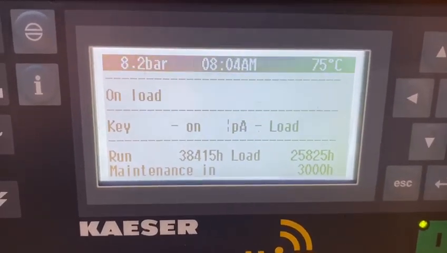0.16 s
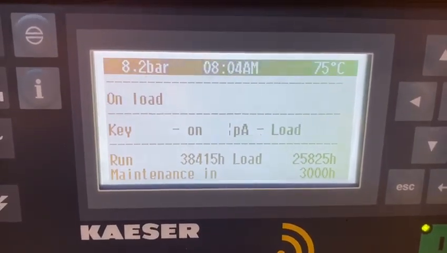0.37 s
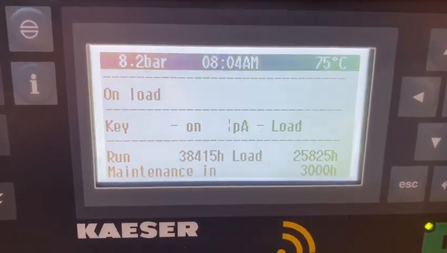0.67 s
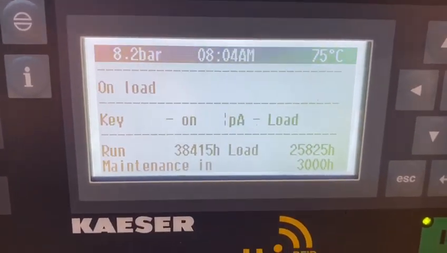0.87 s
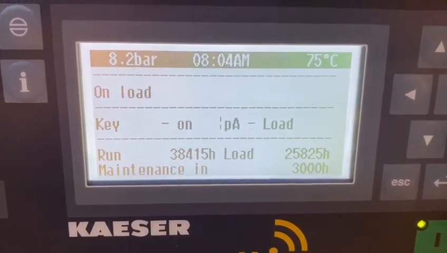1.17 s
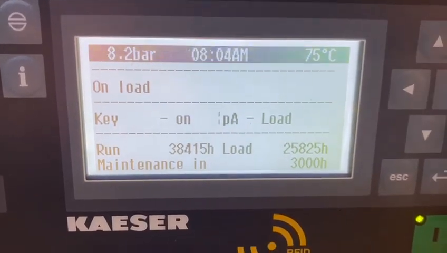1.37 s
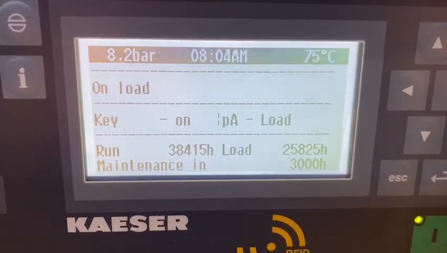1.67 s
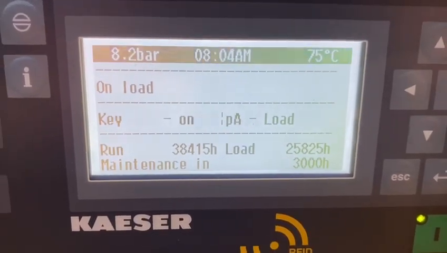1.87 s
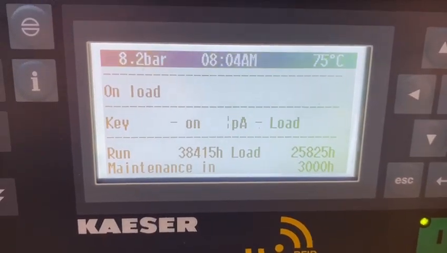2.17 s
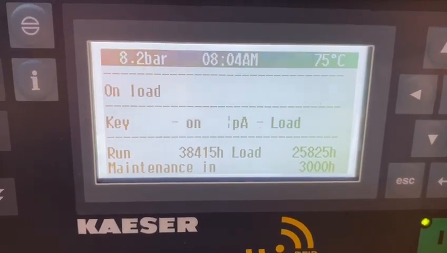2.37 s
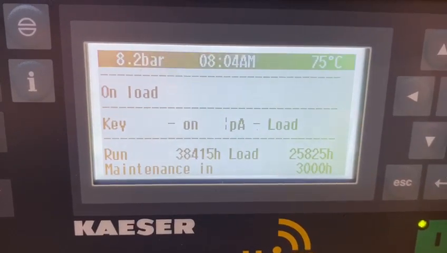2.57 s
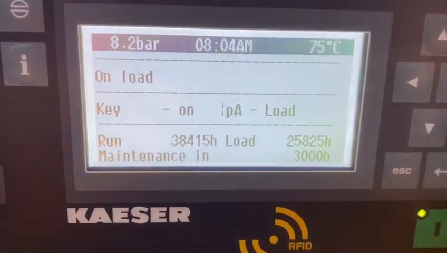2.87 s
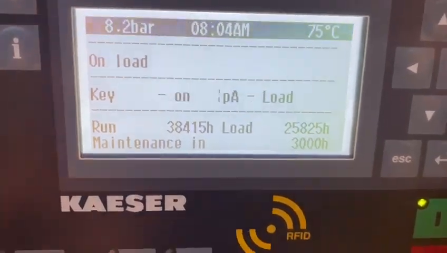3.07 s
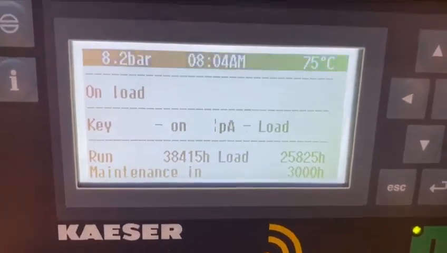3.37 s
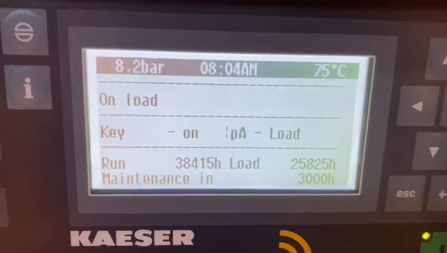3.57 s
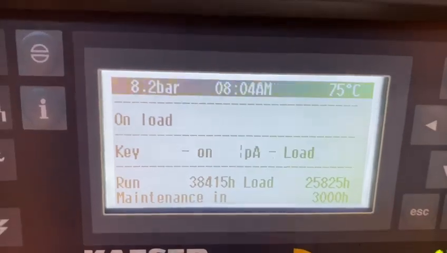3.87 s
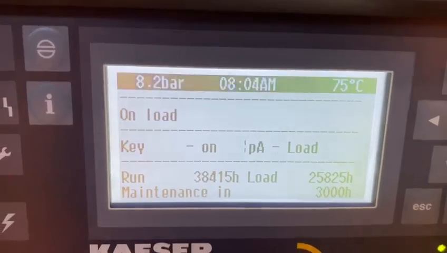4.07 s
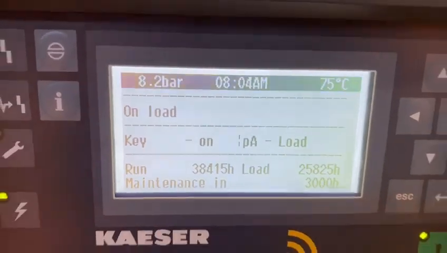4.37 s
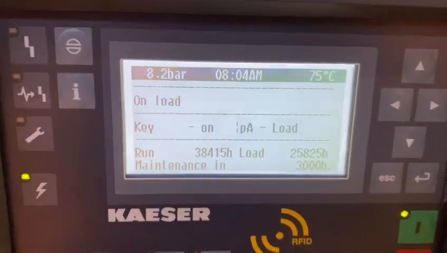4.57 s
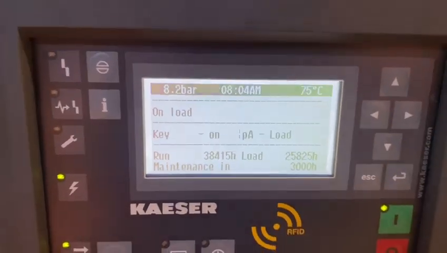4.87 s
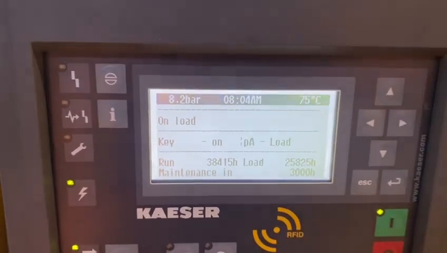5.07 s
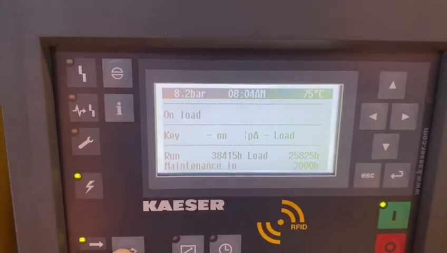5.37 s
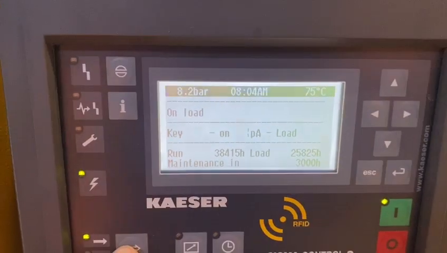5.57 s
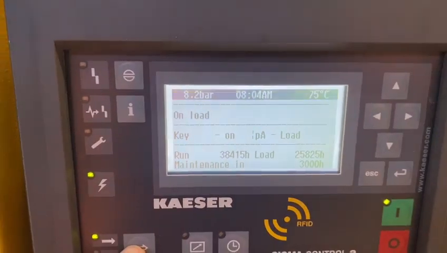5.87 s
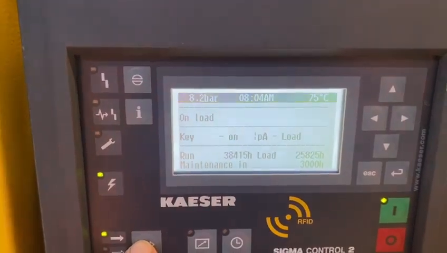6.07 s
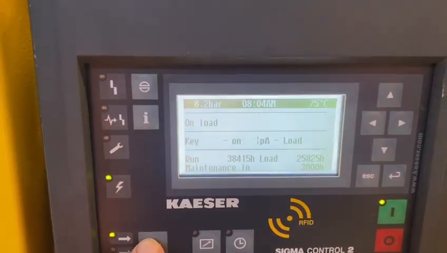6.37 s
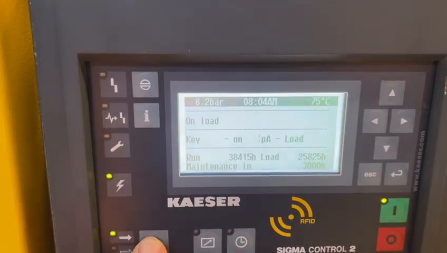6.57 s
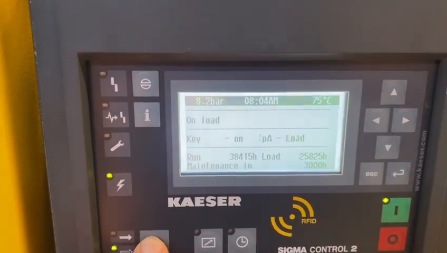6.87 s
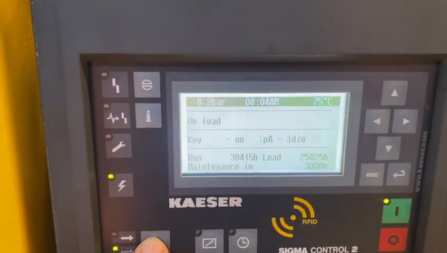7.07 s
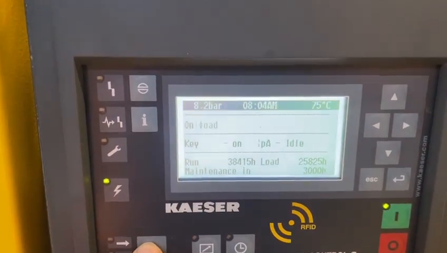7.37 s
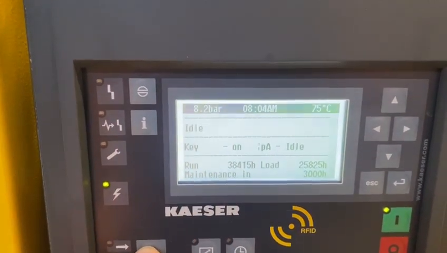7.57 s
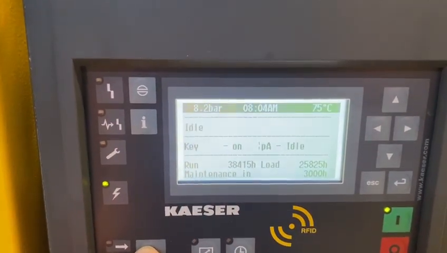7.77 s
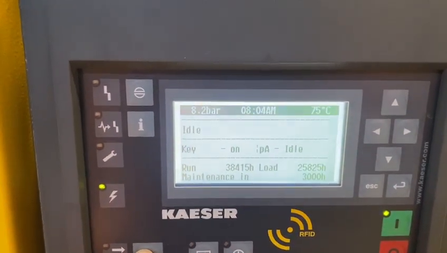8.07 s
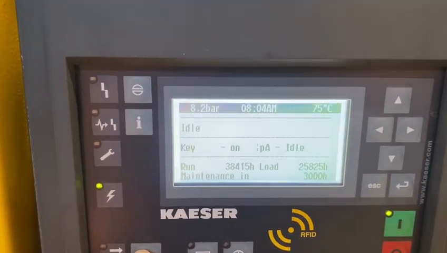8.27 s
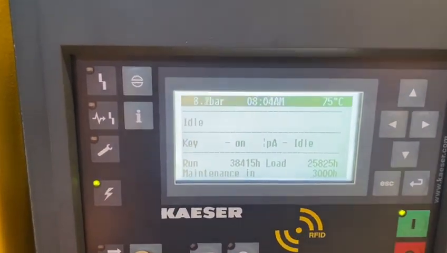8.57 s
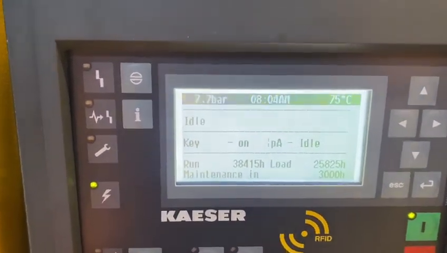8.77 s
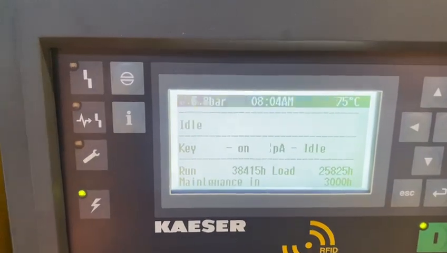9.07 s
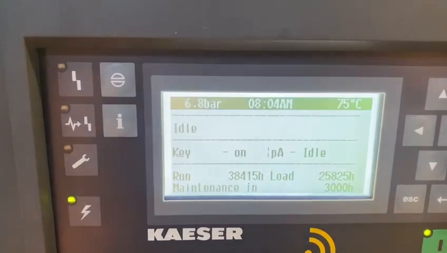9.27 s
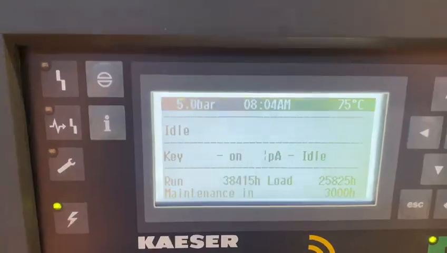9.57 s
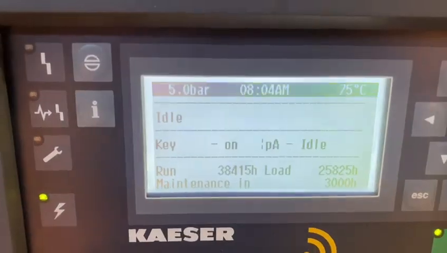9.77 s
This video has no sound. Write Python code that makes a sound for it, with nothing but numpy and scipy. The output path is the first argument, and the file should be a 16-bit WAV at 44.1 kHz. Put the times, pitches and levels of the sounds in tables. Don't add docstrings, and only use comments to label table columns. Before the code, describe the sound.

From 0 s, with no start-up, a screw air compressor is already running at full load in its sheet-metal cabinet in a workshop. Everything sounds at once: a low, slightly lumpy fan rumble strongest near 110 Hz, a faint rotor hum near 250 Hz, a broad casing roar around 1-3 kHz, and a dominant rushing hiss with a noisy whistling band around 6-7 kHz. The stereo microphone is hand-held at arm's length, with short diffuse reflections, a ragged, grainy treble and little above 9 kHz. Around 3-3.3 s it turns, and the hiss shifts colour and gets slightly louder; from 4.4 to 5 s it steps back and the tint changes again. The roar stays steady until about 8 s. Then the inlet closes: the hiss and whistle sink, fastest after 8.6 s, while the casing roar rises slightly and the hum edges up minutely in pitch. It ends near 9.9 s still running, idle.

```python
import sys
import numpy as np
from scipy import signal
from scipy.fft import rfft, irfft, dct, next_fast_len
from scipy.io import wavfile
from scipy.ndimage import uniform_filter1d, map_coordinates

SR = 44100
rng = np.random.default_rng(int(sys.argv[2]) if len(sys.argv) > 2 else 0)


def pcm_store(signal):
    levels = np.round(np.clip(np.atleast_2d(signal), -1, 1) * 32767)
    wavfile.write(sys.argv[1], SR, levels.astype(np.int16).T)


def to_linear_factor(level_db):
    exponent = np.asarray(level_db, float) / 20
    return 10 ** exponent


N = 437463
SIZE = next_fast_len(N)
HZ = np.maximum(np.arange(SIZE // 2 + 1) * SR / SIZE, 1)
PORT_LAG_S = 19.3 / SR

# frequency in Hz, level in dB per Hz, left minus right in dB,
# share heard directly (0-1), extra left lead in rad.
FAN_COLOUR = [(22, -32, -5, 0.8, 0.5), (43, -24, -3.5, 0.7, 1.5), (65, -16.5, -0.5, 0.6, 1.1),
              (83, -13, 3, 0.8, 1.5), (109.7, 1, -3.5, 0.93, 1.4), (152, -4, -0.5, 0.92, 1),
              (217.5, -7.5, -2, 0.95, 0), (322, -12, -5, 0.86, 0.5), (354, -16, -3.5, 0.8, -0.5),
              (421.4, -10.5, -11.5, 1, -0.4), (538, -21, -9, 0.1, 1.5), (721, -19.5, -4, 0.8, -0.5),
              (819, -21.5, 0.5, 0.9, 3), (910, -20.5, 5.5, 0.4, 1.17)]
CASING_COLOUR = [(959, -25.5, -5.5, 0.43, 0.38), (1050, -16.5, -7, 0.62, -0.81),
                 (1210, -17, -0.5, 0.65, -0.99), (1316, -15, 1.5, 0.7, -1.1),
                 (1583, -10.5, -6.5, 0.55, -1.8), (1724, -7.5, -1, 0.66, 0.1), (2032, -10, -3, 0.71, -0.25),
                 (2327, -13, -0.5, 0.51, -0.059), (2720, -12.5, -1, 0.38, 0.37),
                 (3140, -6, -6.5, 0.17, 0.96)]
HISS_COLOUR = [(2600, -13, -2.5, 0.83, -0.18), (3020, -7, 0, 0.56, 0.23), (3900, -8.5, 2, 0.49, -0.12),
               (4250, -10, 1.5, 0.66, -0.46), (4960, -7, 0, 0.31, -0.11), (5230, -9, 0.5, 0.32, .2),
               (5500, -13.5, 10, 0.35, 0), (5730, -5, 9.5, 0.62, 0.036), (6290, 1.5, 1.5, .75, .15),
               (6830, -2.5, 2.5, .7, .2), (7180, -12.5, 5.5, 0.4, 0.32), (7400, -10, 3, 0.3, 0.4),
               (8340, -16, -2, .3, -0.03), (8860, -25, 0, 0.21, -0.13)]
# frequency in Hz, width in Hz, left gain in dB, right gain in dB.
FAN_PANELS = [(231, 12, 5.5, 4), (320, 21, 7, 3.5)]
CASING_PANELS = [(1043, 83, 5, 3.7), (1561, 21, 3.6, 3.9), (1784, 20, 3.4, 3.1)]
# frequency in Hz, gain in dB.
NEAR_PANEL = [(300, .5), (430, 1.2), (600, 0), (800, 1.8), (930, .3), (1045, 3.5), (1170, 1.2), (1400, 1),
              (1560, -2), (1720, 0)]
# frequency in Hz, width in Hz, left gain in dB, right gain in dB.
RIDGES_CLOSE = [(3620.0, 50.0, 3.5, 3.5), (3830.0, 70.0, 5.0, 6.0), (4250.0, 450.0, 3.0, 3.5),
                (4610.0, 80.0, 5.5, 4.5), (5250.0, 380.0, 9.0, 2.0), (5760.0, 90.0, 2.0, 2.0),
                (5830.0, 140.0, -1.5, 2.5), (6110.0, 50.0, 7.0, 3.0), (6310.0, 110.0, -4.0, -4.5),
                (6410.0, 70.0, 4.0, 2.0), (6650.0, 50.0, -2.0, -4.5), (6820.0, 70.0, -4.5, -2.5),
                (7290.0, 320.0, -7.0, -0.5), (7700.0, 50.0, -5.5, -6.5)]
RIDGES_TURNING = [(3610.0, 80.0, 3.5, 4.0), (4300.0, 380.0, 4.0, 3.5), (4600.0, 140.0, 7.0, 5.0),
                  (5110.0, 90.0, 7.0, 3.5), (5310.0, 180.0, 8.0, 1.5), (5740.0, 270.0, -2.5, 3.5),
                  (5990.0, 110.0, 9.0, 6.5), (6190.0, 60.0, 1.0, -3.5), (6370.0, 230.0, 8.0, 4.5),
                  (6620.0, 130.0, 8.5, 6.0), (6650.0, 50.0, -9.0, -9.0), (7010.0, 60.0, 5.0, 5.5),
                  (7150.0, 470.0, -2.0, 4.0), (7610.0, 60.0, 4.0, 2.0)]
RIDGES_BACK = [(3120.0, 70.0, 2.5, 3.5), (3320.0, 70.0, 4.5, 5.0), (4310.0, 500.0, 5.5, 5.0),
               (4950.0, 150.0, -3.0, -5.0), (5240.0, 500.0, 9.0, 4.0), (5780.0, 170.0, -2.0, -5.5),
               (5900.0, 500.0, -2.0, 9.0), (6130.0, 330.0, 8.0, 0.0), (6420.0, 60.0, 9.0, 6.5),
               (6580.0, 80.0, 9.0, 6.5), (6660.0, 60.0, -3.0, -4.0), (7130.0, 500.0, 5.0, 9.0),
               (7170.0, 80.0, -6.5, -4.0), (7670.0, 60.0, 4.0, 3.0)]
# frequency in Hz, extra left lead in rad close, turning, back.
STANCE_LEAD = [(2900, 0, 0, 0), (3400, 0, .7, 0), (4000, 0, 1.2, 0), (4250, 1.2, 1.2, 0), (4450, 0, 0, 0),
               (4650, -1, 0, 0), (4800, -2.3, 0, 0), (5000, -4.1, 0, 0), (5250, -5.3, 0, -.3),
               (5450, -6.3, 0, -.5), (5800, -5.4, 0, 0), (6400, -5.7, 0, 0), (6800, -6.28, 0, 0),
               (7250, -6.28, .8, .9), (7500, -6.9, -.5, -.7), (8000, -7, 0, 0)]
TOP_DB = [-6, -7.5, -6.5]
# time in seconds, stance (0 close, 1 turning, 2 back).
HAND = [
    (0, 0),
    (2.9, 0),
    (3.3, 1),
    (4.4, 1),
    (5.0, 2),
    (9.92, 2),
]
# time in seconds, pressure as a share of full (0-1).
PRESSURE = [
    (0, 0.99),
    (7.9, 0.97),
    (8.6, .85),
    (9.1, 0.5),
    (9.55, .2),
    (9.92, 0.05),
]
# time in seconds, load (0-1).
LOAD = [
    (0, 1),
    (8.0, 1),
    (8.6, .5),
    (9.2, .1),
    (9.92, 0),
]
# order of the lobe rate, then level in dB loaded left, loaded right, idle left, idle right.
HUM = [(1, -55, -53, -54, -60), (2, -55, -59, -53.5, -56.5), (3, -63, -60.5, -55, -54),
       (4, -58, -66, -72, -80.5), (5, -77.5, -64, -73, -70), (6, -73, -57.5, -54, -65)]
# frequency in Hz, rounding step over the usual level in dB for sum, for
ROUNDING_STEPS = [(300, -14, -14), (750, -2.5, -5), (1500, 0, -3), (1900, -1, 4), (2400, 0, 7), (2800, 3.5, 2),
                  (3200, 6, 3), (3500, 4.5, 4), (3800, 7, 5), (4100, 6, 6), (4500, 4.5, 6.5), (5000, 2, 4),
                  (5600, 1.5, -1), (6400, -4, -1), (7100, 7, 9.5), (7500, 8, 7.5), (7900, 8.5, 8.5),
                  (8300, 10.5, 10), (8700, 15.5, 15.5), (9300, 19, 20)]

FAN_DB, CASING_DB, HISS_DB, WHISTLE_DB = -41, -38.5, -33.5, -30
TURNED_HISS_DB, TURNED_WHISTLE_DB = 1.02, 2
VENTED_CASING_DB, VENTED_HISS_DB, VENTED_WHISTLE_DB = 1.5, -3.5, -7.5
WHISTLE_LOW_HZ, WHISTLE_HIGH_HZ, TOP_LOW_HZ = 5640, 7100, 7326
LOBES_LOADED_HZ, LOBES_IDLE_HZ = 248.1, 249.4
HOP, FRAME_LEAD = 1024, 524
ROUND_UP = .4
STEP_WANDER_DB = 3.5
BITE_FROM_S, BITE_UNTIL_S, BITE_DB = 5.5, 7.95, 4.6
BITE_HZ, BITE_WIDTH_HZ = 3520, 300
TOP_SHADE_DB, TOP_FLICKER_DB, TOP_FROM_HZ = 2.0, 1.6, 7400


def in_time(rows):
    s, *columns = np.transpose(rows)
    return [np.interp(np.arange(N) / SR, s, c) for c in columns]


def in_pitch(rows, hz):
    at, *columns = np.transpose(rows)
    return [np.interp(np.log(hz), np.log(at), c) for c in columns]


def drift(rate):
    knots = rng.standard_normal(400)
    return map_coordinates(knots, [np.arange(N) / SR * np.clip(rate, .1, 38)], order=2)


def white():
    real, imaginary = rng.standard_normal((2, len(HZ)))
    return real + 1j * imaginary


def echoes(t60):
    s = np.arange(SR // 2) / SR
    swarm = rng.standard_normal(len(s)) * to_linear_factor(-60 * s / t60)
    return rfft(swarm / np.sqrt(np.sum(swarm ** 2)), SIZE)


def at_ports(colour, ridges, t60, near, shift=0):
    level_db, balance_db, direct, lead = in_pitch(colour, HZ)
    direct, near = np.clip(direct, 0, .99), np.clip(near, 0, 1)
    source = white()
    late = np.exp(-1j * (2 * np.pi * HZ * PORT_LAG_S + lead + shift))
    ports = []
    for side, path in enumerate((1, late)):
        gain_db = level_db + balance_db * (.5 - side)
        for hz, width_hz, *ridge_db in ridges:
            gain_db = gain_db + ridge_db[side] / (1 + (2 * (HZ - hz) / width_hz) ** 2)
        around = np.sqrt(near) * source * echoes(t60) + np.sqrt(1 - near) * white()
        ports.append(to_linear_factor(gain_db) * (np.sqrt(direct) * source * path + np.sqrt(1 - direct) * around))
    return np.array(ports)


def band(spectrum, low, high):
    rise = np.clip(np.log(HZ / [[low], [high]]) * 12 + .5, 0, 1)
    sound = irfft(spectrum * np.sqrt(rise[0] * (1 - rise[1])), SIZE)[:, :N]
    return sound / np.std(sound.mean(axis=0))


def fan(level_db):
    stereo = at_ports(FAN_COLOUR, FAN_PANELS, t60=.3, near=.25)
    return to_linear_factor(level_db + .5 * drift(1.4)) * band(stereo, low=15, high=994)


def casing(level_db):
    stereo = at_ports(CASING_COLOUR, CASING_PANELS, t60=.3, near=.35)
    return to_linear_factor(level_db + 1.0 * drift(6)) * band(stereo, low=950, high=2903)


def air(hiss_db, whistle_db):
    stance, = in_time(HAND)
    hiss, whistle = 0, 0
    for k, ridges in enumerate((RIDGES_CLOSE, RIDGES_TURNING, RIDGES_BACK)):
        weight = np.sqrt(np.clip(1 - abs(np.clip(stance, 0, 2) - k), 0, 1))
        shift = in_pitch(STANCE_LEAD, HZ)[k]
        stereo = at_ports(HISS_COLOUR, ridges, t60=.2, near=.3, shift=shift)
        top = to_linear_factor(TOP_DB[k]) * band(stereo, low=TOP_LOW_HZ, high=8800)
        hiss = hiss + weight * (band(stereo, low=2894, high=WHISTLE_LOW_HZ) + top)
        whistle = whistle + weight * band(stereo, low=WHISTLE_LOW_HZ, high=WHISTLE_HIGH_HZ)
    return to_linear_factor(hiss_db + .5 * drift(9)) * hiss + to_linear_factor(whistle_db + .7 * drift(9)) * whistle


def rotors():
    load, = in_time(LOAD)
    lobes_hz = LOBES_IDLE_HZ + load * (LOBES_LOADED_HZ - LOBES_IDLE_HZ)
    turn, out = 2 * np.pi * np.cumsum(lobes_hz) / SR, 0
    for order, *db in HUM:
        loaded_db, idle_db = np.reshape(db, (2, 2, 1))
        hz = order * LOBES_LOADED_HZ
        lead = in_pitch(FAN_COLOUR + CASING_COLOUR[1:], hz)[3]
        late = 2 * np.pi * hz * PORT_LAG_S + lead
        wave = np.sin(order * turn + rng.uniform(0, 2 * np.pi) - late * np.array([[0], [1]]))
        level_db = idle_db + load * (loaded_db - idle_db) + 2.5 * drift(1.5)
        out = out + np.sqrt(2) * to_linear_factor(level_db) * wave
    return out


def round_lines(stereo):
    pair = np.array([[1, 0.99], [1, -1]])
    taper = signal.windows.kaiser_bessel_derived(2 * HOP, 4 * np.pi)
    pad = (HOP + FRAME_LEAD, 2 * HOP - (N + FRAME_LEAD) % HOP)
    blocks = np.pad(pair @ stereo / 2, ((0, 0), pad)).reshape(2, -1, HOP)
    frames = np.concatenate([blocks[:, :-1], blocks[:, 1:]], axis=2) * taper
    a, b, c, d = np.split(frames, 4, axis=2)
    folded = np.concatenate([-c[..., ::-1] - d, a - b[..., ::-1]], axis=2)
    lines = dct(folded, type=4, norm="ortho")
    hz = (np.arange(HOP) + .5) * SR / 2 / HOP
    s = np.arange(lines.shape[1])[:, None] * HOP / SR
    usual = uniform_filter1d((lines ** 2).mean(axis=0), size=20, axis=1)
    usual = uniform_filter1d(usual, size=43, axis=0)
    wander_db = STEP_WANDER_DB * np.repeat(rng.standard_normal((len(s), HOP // 8)), 8, axis=1)
    ramp = np.clip(1.4 * (s - BITE_FROM_S) / (BITE_UNTIL_S - BITE_FROM_S), 0, 1) * (s < BITE_UNTIL_S)
    bite_db = BITE_DB * ramp * np.exp(-((hz - BITE_HZ) / BITE_WIDTH_HZ) ** 2)
    turned = np.clip(np.interp(s, *np.transpose(HAND)), 0, 1)
    flicker_db = TOP_FLICKER_DB * rng.standard_normal(s.shape)
    shade_db = (TOP_SHADE_DB * turned + flicker_db) * (hz > TOP_FROM_HZ)
    extra_db = (bite_db + shade_db) * [[[1]], [[.3]]]
    step_db = np.array(in_pitch(ROUNDING_STEPS, hz))[:, None] + extra_db + wander_db
    step = np.sqrt(abs(usual) + 1e-18) * to_linear_factor(step_db)
    rounded = np.sign(lines) * np.floor(abs(lines) / step + ROUND_UP) * step
    u, v = np.split(dct(rounded, type=4, norm="ortho"), 2, axis=2)
    unfolded = np.concatenate([v, -v[..., ::-1], -u[..., ::-1], -u], axis=2) * taper
    rise, fall = np.split(unfolded, 2, axis=2)
    return pair @ (rise[:, 1:] + fall[:, :-1]).reshape(2, -1)[:, FRAME_LEAD:FRAME_LEAD + N]


def scene():
    turned = np.clip(in_time(HAND)[0], 0, 1)
    vented = 1 - in_time(PRESSURE)[0]
    hiss_db = HISS_DB + TURNED_HISS_DB * turned + VENTED_HISS_DB * vented
    whistle_db = WHISTLE_DB + TURNED_WHISTLE_DB * turned + VENTED_WHISTLE_DB * vented
    cabinet = fan(FAN_DB) + casing(CASING_DB + VENTED_CASING_DB * vented)
    near = irfft(rfft(cabinet, SIZE) * to_linear_factor(in_pitch(NEAR_PANEL, HZ)[0]), SIZE)[:, :N]
    return turned * cabinet + (1 - turned) * near + air(hiss_db, whistle_db) + rotors()


def low_pass(x):
    return signal.sosfilt(signal.butter(12, 9400, fs=SR, output="sos"), x)


def record(dry):
    mix = round_lines(dry)
    return low_pass(mix)


dry = scene()
out = record(dry)
pcm_store(out)
```